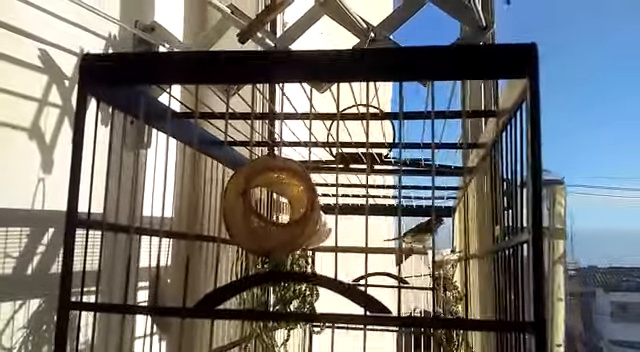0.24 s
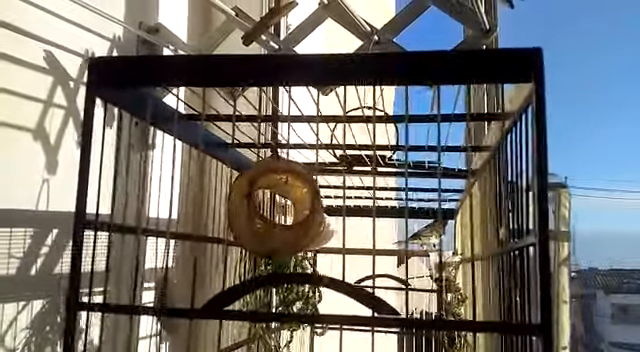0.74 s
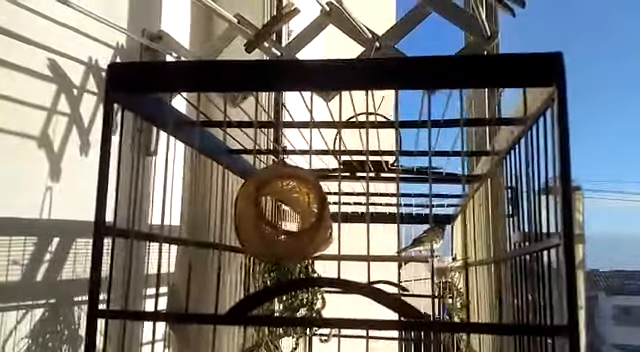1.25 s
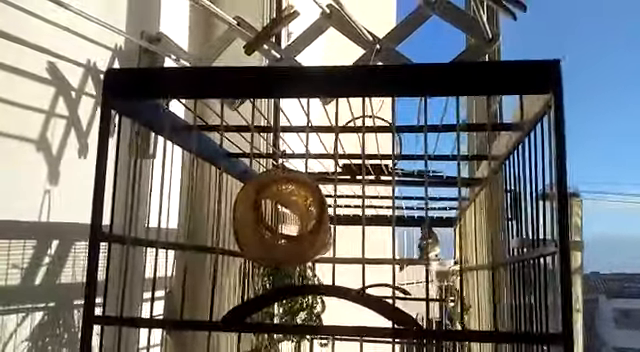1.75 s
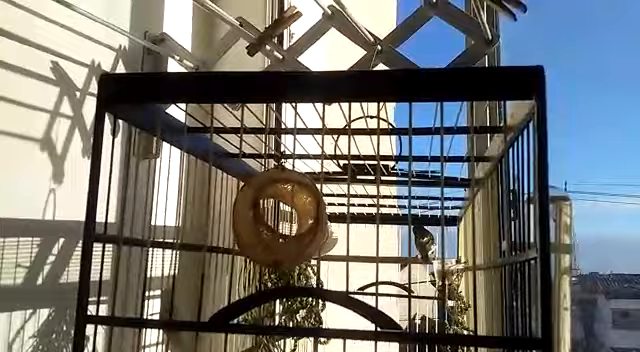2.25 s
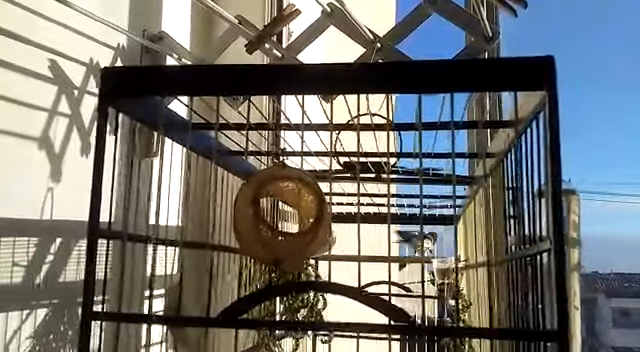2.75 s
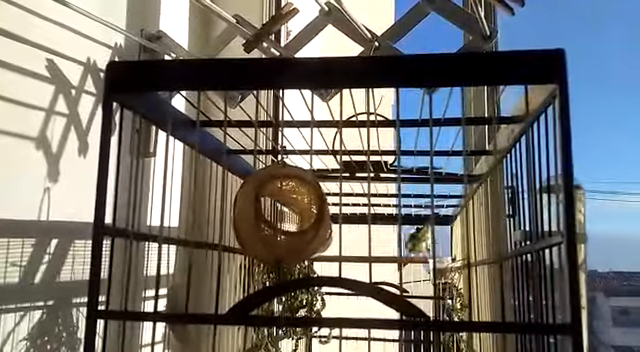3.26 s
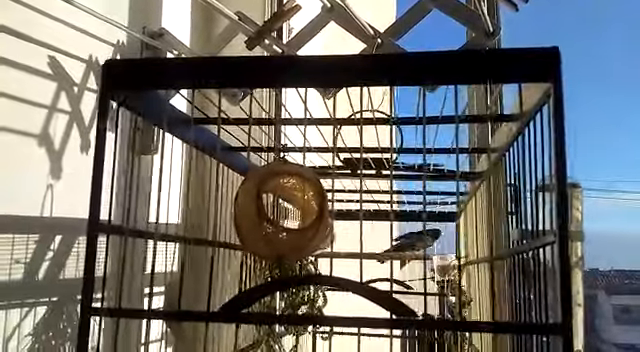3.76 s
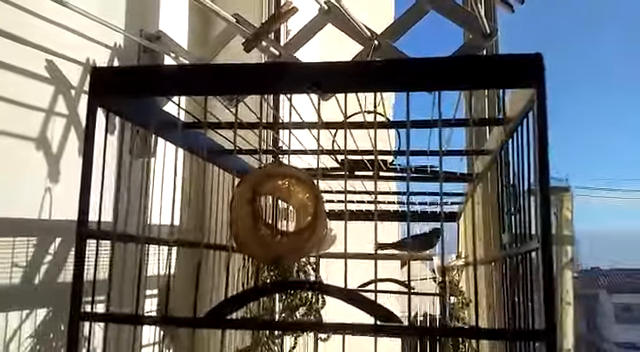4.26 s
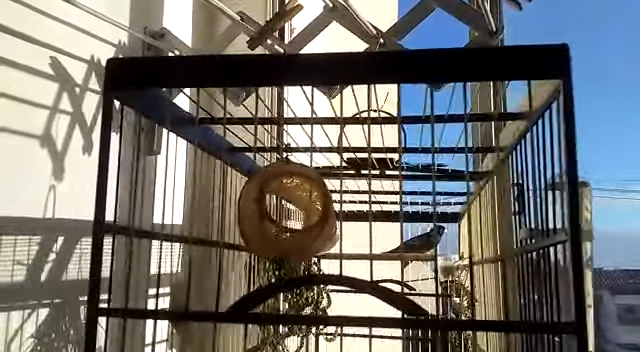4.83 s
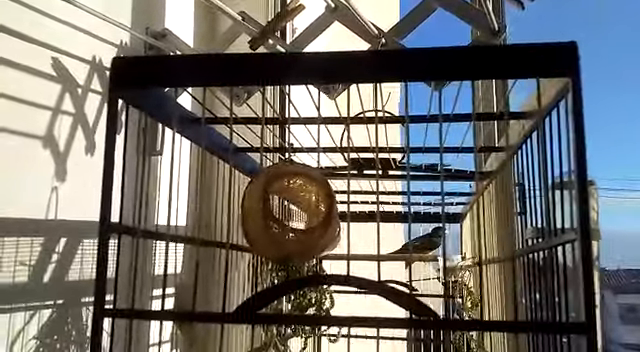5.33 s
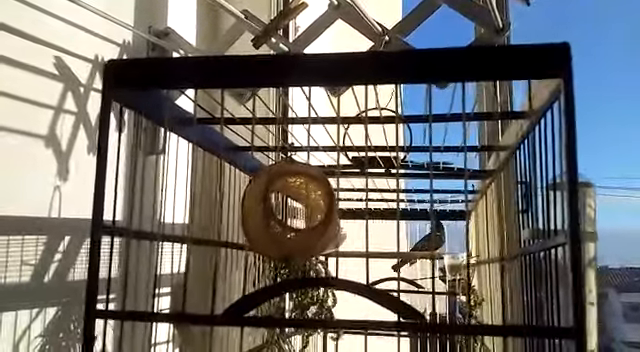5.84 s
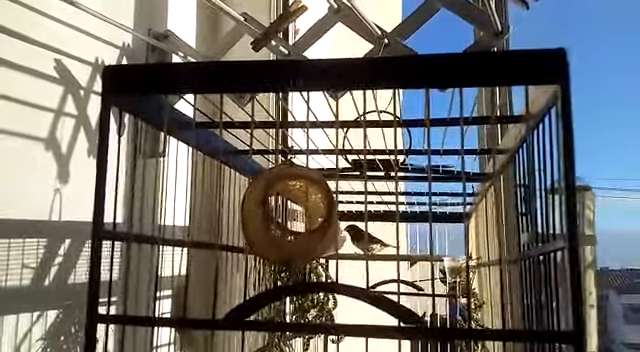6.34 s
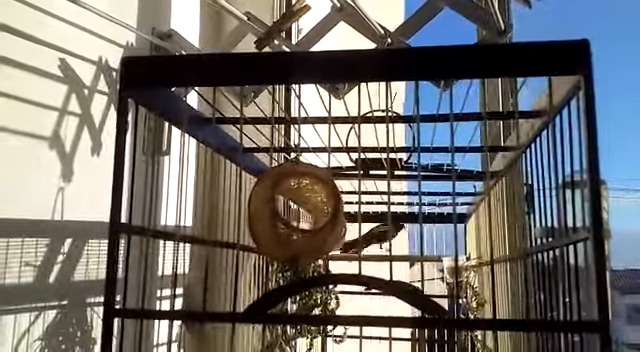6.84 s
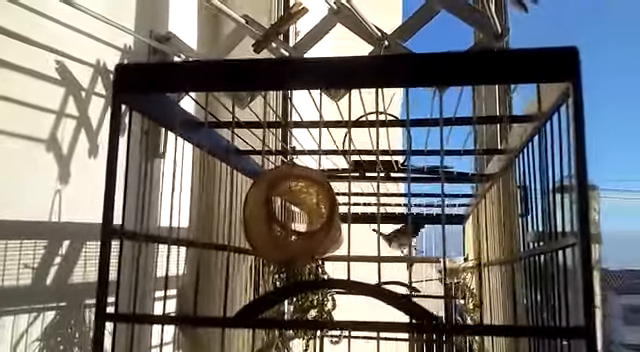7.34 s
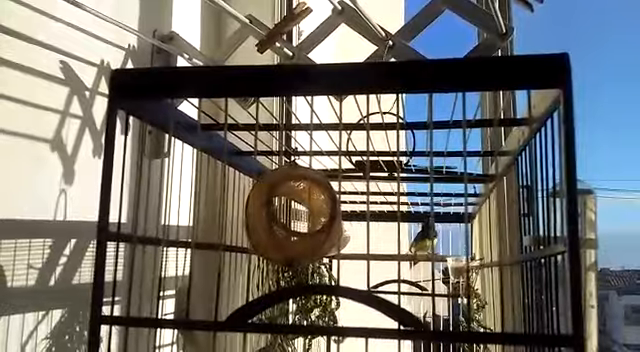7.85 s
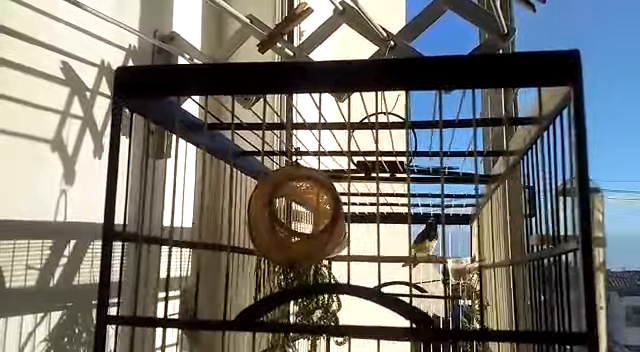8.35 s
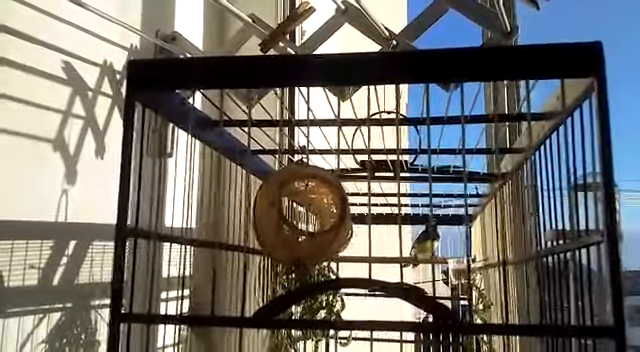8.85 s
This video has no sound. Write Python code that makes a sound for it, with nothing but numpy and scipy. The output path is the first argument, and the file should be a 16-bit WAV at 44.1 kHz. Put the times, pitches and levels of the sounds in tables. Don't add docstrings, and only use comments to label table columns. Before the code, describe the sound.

A close microphone catches a caged songbird's very loud, high phrases, each a short buzz sliding down into a clear whistle, with bright wall echoes. Between its two phrases come soft hollow thuds, a faraway bird's blurred reverberant song, and metallic claw ticks. Distant traffic, surging engine rumble, motor hum, faint insects and hiss continue underneath. The second phrase finishes with fast, piercing repeated notes.

```python
import sys
import numpy as np
from scipy import signal
from scipy.io import wavfile
from scipy.ndimage import uniform_filter1d

SR = 44100
rng = np.random.default_rng(int(sys.argv[2]) if len(sys.argv) > 2 else 0)


def materialize(psi):
    bounded = np.clip(np.atleast_2d(psi).T, -1, 1)
    quanta = np.round(bounded * 32767).astype(np.int16)
    wavfile.write(sys.argv[1], SR, quanta)


def field_ratio(decibels):
    return 10 ** (np.asarray(decibels, dtype=float) / 20)


N = 400869


def evened(x):
    return x / np.sqrt(np.mean(x ** 2) + 1e-20)


def add(mix, start_s, sound):
    part = mix[round(start_s * SR):][:len(sound)]
    part += sound[:len(part)]


def drift(size, rate_hz):
    knots = rng.standard_normal(max(int(size / SR * rate_hz * 4) + 8, 8192))
    smooth = uniform_filter1d(uniform_filter1d(knots, size=2), size=3)
    return np.interp(np.arange(size) / SR * rate_hz * 4, np.arange(len(knots)), evened(smooth))


def swells(rows, rest_db):
    t = np.arange(0, N + 64, 64) / SR
    power = field_ratio(rest_db) ** 2
    for peak_s, db, half_s in rows:
        power = power + field_ratio(db) ** 2 * np.exp(-2 * ((t - peak_s) / half_s) ** 2)
    return np.interp(np.arange(N) / SR, t, np.sqrt(power))


def resonate(x, hz, width_hz):
    turn = np.exp(2j * np.pi * np.cumsum(hz * np.ones(len(x))) / SR)
    r = np.exp(-np.pi * width_hz / SR)
    return 2 * (turn * signal.lfilter([1 - r], [1, -r], x / turn)).real


def noise(spectrum, patchy_db, size=2048):
    hz = np.fft.rfftfreq(size, 1 / SR)
    knot_hz, knot_db = np.transpose(spectrum)
    count = min(len(hz), size * len(spectrum) ** 2 // 390)
    z = np.zeros((len(hz), 4 * N // size + 5), complex)
    real, imag, patches = rng.standard_normal((3, count, z.shape[1]))
    patches = evened(uniform_filter1d(uniform_filter1d(patches, size=14, axis=0), size=8, axis=1))
    colour_db = np.interp(np.log(hz + 1), np.log(knot_hz + 1), knot_db, left=-90, right=-90)
    z[:count] = (real + 1j * imag) * field_ratio(colour_db[:count, None] + patchy_db * patches)
    return evened(signal.istft(z, nperseg=size, noverlap=3 * size // 4)[1][:N])


def echoes(x, start_s, rise_s, decays):
    t = np.arange(SR) / SR
    taps = np.zeros(SR)
    at = np.arange(0, SR - 12, 12)
    taps[at + rng.integers(0, 12, len(at))] = rng.choice([-1., 1.], len(at))
    taps *= np.clip((t - start_s) / rise_s, 0, 1) * sum(field_ratio(db - 60 * t / t60_s) for db, t60_s in decays)
    return signal.oaconvolve(x, taps / np.linalg.norm(taps))[:N]


def town():
    # hz, density_db
    rumble_spectrum = [(24, -39.5), (33, -20), (42, -5.5), (50, -13), (62, 3.8), (78, -8.5), (92, -20.5),
                       (102, -20), (135, -24)]
    drone_spectrum = [(76, -33), (130, 1), (199, -4.5), (242, -2), (322, -14.5), (330, -10), (430, -42),
                      (730, -120)]
    traffic_spectrum = [(260, -30.5), (450, -8.5), (556, -5), (811, -2), (1110, -8.5), (1210, -8.5),
                        (1500, -8.5), (1950, -33.5), (3300, -120)]
    hiss_spectrum = [(59, -26), (100, 1.5), (173, -18), (248, -18.5), (300, -18), (363, -15), (508, -20.5),
                     (809, -20), (1370, -28), (1800, -23.5), (2480, -29.5), (3860, -32.5), (5180, -30),
                     (7120, -35.5), (15500, -39.5)]
    # peak_s, peak_db, half_length_s
    surge_rows = [(.17, -44, 0.13), (.84, -40.5, 0.27), (1.4, -41.5, 0.37), (1.7, -34.5, .07),
                  (1.9, -42.5, 0.089), (3.04, -43.5, 0.11), (3.42, -44, .2), (3.97, -50, 0.084),
                  (4.4, -44.5, .1), (4.82, -31, 0.054), (5.3, -38.5, .06), (5.48, -41.5, 0.088),
                  (5.72, -44, .15), (6.16, -38.5, .08), (6.48, -41.5, 0.12), (6.76, -36, .06),
                  (7.12, -40, 0.16), (7.38, -34, .1), (7.72, -36.5, 0.07), (7.89, -35.5, 0.075),
                  (8.3, -43.5, 0.36), (8.78, -40, 0.039), (9.08, -41, 0.17)]
    # time_s, level_db
    passing_rows = [(0, -65), (.38, -58), (.8, -61.5), (1.6, -57), (2.4, -61.5), (2.76, -56), (3.2, -74.5),
                    (4.0, -53.5), (4.8, -57.5), (5.35, -64), (6.0, -59), (6.76, -55), (7.4, -55),
                    (7.87, -61), (8.15, -49.5), (9.09, -55.5)]

    rumble = swells(surge_rows, rest_db=-51.5) * noise(rumble_spectrum, patchy_db=-0.3, size=8192)
    drone_db = -56.5 - 3.5 + 1.5 * drift(N, 1.5)
    drone = field_ratio(drone_db) * noise(drone_spectrum, patchy_db=2.0, size=4096)
    traffic_db = np.interp(np.arange(N) / SR, *np.transpose(passing_rows)) - 2.5
    traffic = field_ratio(traffic_db) * noise(traffic_spectrum, patchy_db=3.5)
    hiss_to_top = [*hiss_spectrum, (17000, hiss_spectrum[-1][1])]
    hiss = field_ratio(-52 - 2.5) * noise(hiss_to_top, patchy_db=1.56)
    return rumble + drone + traffic + hiss


def insects():
    # centre_hz, width_hz, level_db
    chirr_bands = [(6500, 300, -78.5), (9246, 1100, -78)]
    out = np.zeros(N)
    for hz, width_hz, db in chirr_bands:
        band = resonate(resonate(rng.standard_normal(N), hz, width_hz), hz, width_hz)
        out += field_ratio(db + 2.5 * drift(N, 3.1)) * evened(band)
    return out


def machine():
    # hz, level_db
    hum_lines = [(177.6, -64.5), (242.2, -67), (355.3, -65.5), (414.5, -68), (807.5, -63), (947.5, -73.5),
                 (1351, -91), (1836, -74.5), (2008, -88)]
    # peak_s, peak_db, half_length_s
    whine_rows = [(.15, -55.5, 0.031), (.38, -53.5, 0.075), (.78, -62.5, 0.091), (1.2, -49.5, .15),
                  (1.82, -58, 0.085), (2.13, -57.5, .1), (2.88, -58.5, 0.32), (3.82, -53.5, 0.11),
                  (4.8, -58, 0.35), (5.11, -54, 0.033), (5.82, -52.5, 0.034), (6.08, -63, 0.1),
                  (6.68, -52.5, 0.093), (7.44, -52, 0.031), (7.72, -56.5, 0.21), (8.4, -55.5, .07),
                  (8.68, -52.5, .1)]
    whine_hz = 806

    t = np.arange(N // 8 + 1) * 8 / SR
    lines = np.zeros(len(t))
    for hz, db in hum_lines:
        if abs(hz - whine_hz) > 20:
            lines += field_ratio(db + 4.5 * drift(len(t), 60)) * np.sin(2 * np.pi * hz * t)
    thin_band = evened(resonate(rng.standard_normal(N), whine_hz, 2))
    whine = field_ratio(-3.0) * swells(whine_rows, rest_db=-72.5) * thin_band
    return np.sqrt(2) * signal.resample_poly(lines, 8, 1)[:N] + whine


def thuds():
    # start_s, peak_db, length_s
    thud_rows = [
        (3.151, -31, 0.082),
        (3.583, -33.5, 0.0687),
        (3.969, -38.5, 0.068),
    ]
    # hz, width_hz, level_db
    body_modes = [(225, 133, 1.5), (414, 31, -4), (674, 28, -25)]
    # start_s, length_s, pitch_hz, width_hz, level_db
    knock_rows = [
        (.32, 0.042, 1320, 252, -52),
        (1.164, 0.048, 1990, 60, -58.5),
        (3.948, 0.091, 1225, 40, -61),
        (4.122, 0.09, 1230, 60, -77),
    ]

    out = np.zeros(N)
    for start_s, db, length_s in thud_rows:
        push = rng.standard_normal(int(length_s * SR))
        body = np.zeros(len(push))
        for hz, width_hz, mode_db in body_modes:
            mode = resonate(resonate(push, hz, width_hz), hz, width_hz)
            body += field_ratio(mode_db) * mode / np.sqrt(width_hz)
        add(out, start_s, field_ratio(db - 4.5) * evened(body) * signal.windows.tukey(len(push), .5))
    for start_s, length_s, hz, width_hz, db in knock_rows:
        push = rng.standard_normal(int(length_s * SR))
        knock = evened(resonate(resonate(push, hz, width_hz), hz, width_hz))
        add(out, start_s, field_ratio(db) * knock * signal.windows.tukey(len(push), .3))
    return out + field_ratio(-8) * echoes(out, 0.016, 0.029, [(0.1, 0.5)])


def cage():
    # start_s, peak_db, low_ring_db and top_db (over the peak), t60_s
    tick_rows = [(0.3304, -48.5, -12, -19, 0.077), (3.469, -47, -8.5, -17.5, 0.067),
                 (6.0601, -32.5, -24, -15, 0.06), (6.3005, -46, -37, -12.5, 0.06),
                 (6.6194, -57, -14, -18, 0.06), (6.8833, -40, -3, -29, 0.072), (6.9363, -38, -1, -17, 0.06),
                 (7.001, -42, 0, -21, 0.068), (7.3603, -39, -2, -25.5, 0.078)]
    # hz, level_db, t60_s (the tick's own t60 rules)
    wire_modes = [(4150, -5, 0.11), (4720, 13, 0.068), (5900, 5, 0.028), (6170, -20, 0.41),
                  (8300, -13, 0.2), (11100, -20.5, 0.07), (12230, -19.5, 0.16), (12200, -25, 0.16),
                  (14300, -20, 0.26)]

    out = np.zeros(N)
    t = np.arange(SR // 5) / SR
    for start_s, db, low_db, top_db, t60_s in tick_rows:
        scratch = np.diff(rng.standard_normal(len(t) + 1))
        ring = np.zeros(len(t))
        for hz, wire_db, _ in wire_modes:
            mode_db = (low_db + 13.) * (hz < 6500) + (top_db + 10.) * (hz > 10000) + 0.51 * wire_db
            tuned_hz = hz * rng.uniform(1.0, 1.02)
            ring += field_ratio(mode_db) * resonate(scratch, tuned_hz, 280) * 5000 / hz
        dry_scratch = scratch * field_ratio(top_db + 6.0 - 60 * t / 0.044)
        add(out, start_s, field_ratio(db - 7.0 - 60 * t / t60_s) * (.7 * evened(ring) + dry_scratch))
    return out + field_ratio(-2.5) * echoes(out, 0.0024, 0.0036, [(0.1, 0.36)])


def syrinx(hz, db, edge_s, half_db, breath_db, bright_db=0., fuzz=.25):
    # multiple, level_db
    overtone_rows = [(2, -34.5), (3, -32.5), (4, -43.5)]
    turn = 2 * np.pi * np.cumsum(hz) / SR
    upper = field_ratio(half_db) * (np.sin(3 * turn / 2) + 0.12 * np.sin(5 * turn / 2))
    for k, overtone_db in overtone_rows:
        upper += field_ratio(overtone_db + bright_db) * np.sin(k * turn) * (k * hz < 19000)
    tone = np.sin(turn) * (1 + field_ratio(breath_db) * drift(len(hz), 1500))
    tone += upper * (1 + fuzz * drift(len(hz), 2500))
    t = np.arange(len(hz)) / SR
    fade = np.clip(np.minimum(t, t[-1] - t) / edge_s, 0, 1) ** 2
    return np.sqrt(2) * field_ratio(db) * tone * fade


def glide(start_s, length_s, first_hz, last_hz, db, swell_db, release_db=7, settle=1.9, linger=0.98,
          break_db=0.):
    peak_at = 0.69
    u = np.linspace(0, 1, num=40)
    hz = last_hz + (first_hz - last_hz) * (1 - u ** linger) ** settle
    level_db = db - swell_db * np.clip(1 - u / peak_at, 0, 1)
    level_db -= release_db * np.clip((u - peak_at) / (1 - peak_at), 0, 1) ** 2
    level_db -= break_db * np.exp(-((hz - 4190) / 70.) ** 2)
    return np.transpose([start_s + u * length_s, level_db, hz])


def whistle(rows, wobble, edge_s=0.0031, half_db=-50, breath_db=-36, bright_db=-5.0, fuzz=0.083):
    s, db, hz = np.transpose(rows)
    t = np.arange(s[0], s[-1], 1 / SR)
    pitch_hz = uniform_filter1d(np.interp(t, s, hz), size=200, mode="nearest")
    pitch_hz = pitch_hz * (1 + wobble * drift(len(t), 300))
    level_db = np.interp(t, s, db)
    return s[0], syrinx(pitch_hz, level_db, edge_s, half_db, breath_db, bright_db, fuzz)


def trill(start_s, length_s, hz, swing_hz, db, rise_share, dip_db, half_db, lead_s=0, focus_db=0.0,
          cycles_per_sweep=48, peak_at=0.87, buzz=0):
    t = np.arange(0, length_s, 1 / SR)
    u = t / length_s
    sweeps_per_s = hz / cycles_per_sweep
    cycle = (sweeps_per_s * np.maximum(t - lead_s, 0) + 0.088 * drift(len(t), 110) * u) % 1
    fall = np.clip(1 - rise_share, .05, .95)
    sweep = np.interp(cycle, [0, fall, 1], [1, -1, 1])
    sweep = uniform_filter1d(np.where(t < lead_s, .4, sweep), size=40, mode="nearest")
    pitch_hz = hz + swing_hz * (1 - 0.42 * u ** 3) * sweep

    dip = uniform_filter1d(1. * (cycle > fall), size=70)
    blip_db = -4 - 18 * (2 * t / (lead_s + 1e-9) - .9) ** 2
    blip_db = uniform_filter1d(np.where(t < lead_s, blip_db, 0), size=30)
    level_db = db - 11 * (1 - u / peak_at) ** 2 + blip_db - dip_db * dip
    level_db -= focus_db * sweep ** 2

    buzz_hz = 429.2 * (1 + .12 * drift(len(t), 200))
    split = buzz * (t > lead_s) * (1 - u ** 3)
    beat = 1 - split + split * np.sqrt(2) * np.cos(2 * np.pi * np.cumsum(buzz_hz) / SR)
    voice = syrinx(pitch_hz, level_db, .003, half_db, breath_db=-24, bright_db=1.5, fuzz=.4)
    return start_s, beat * voice


def far_bird():
    # start_s, length_s, first_hz, last_hz, peak_db
    far_whistles = [(1.523, .07, 3873, 3360, -60.5), (3.79, .16, 4205, 3655, -58),
                    (4.1, 0.11, 3390, 3280, -67.5), (4.135, .195, 4500, 3694, -49.5),
                    (4.328, 0.12, 5213, 4617, -42.5), (4.47, 0.117, 2905, 3070, -51.5),
                    (4.561, 0.18, 4000, 4000, -44.5), (4.9, .1, 5187, 4928, -42.5),
                    (5.079, .3, 3620, 3476, -55.5), (5.109, 0.044, 3250, 2945, -53),
                    (5.179, 0.25, 3300, 2916, -60)]
    # start_s, length_s, centre_hz, swing_hz, level_db
    far_trills = [(3.728, 0.061, 4206, 597, -55), (4.136, 0.073, 4150, 409, -70),
                  (4.318, 0.096, 5080, 350, -67), (4.575, .2, 3206, 412, -48.5),
                  (4.822, .075, 5430, 693, -39.5), (5.039, .12, 5120, 1306, -42.5),
                  (5.237, .14, 5080, 1542, -45.5), (5.118, 0.29, 3250, 380, -56)]
    # start_s, length_s, first_hz, last_hz, peak_db
    chirp_rows = [(0, 0.11, 5900, 5780, -66.5), (.325, 0.063, 5500, 5770, -65), (.53, .06, 5300, 5240, -70),
                  (.65, .06, 5250, 5270, -69), (.745, .63, 5264, 5120, -75.5),
                  (1.43, 0.18, 5180, 5000, -68.5)]
    # start_s, length_s, first_hz, last_hz, peak_db
    sweep_rows = [
        (4.984, .065, 8300, 5780, -41),
        (5.181, .085, 9330, 5750, -43),
    ]

    song, sweeps = np.zeros((2, N))
    for row in far_whistles:
        course = glide(*row, swell_db=3.023, release_db=3.5, settle=2.1)
        add(song, *whistle(course, wobble=.017, edge_s=0.007, breath_db=-20.0))
    for row in far_trills:
        add(song, *trill(*row, rise_share=.3, dip_db=4.0, half_db=-30))
    for row in chirp_rows:
        add(song, *whistle(glide(*row, swell_db=1.5, release_db=4.), wobble=.03, edge_s=.006))
    for row in sweep_rows:
        add(sweeps, *whistle(glide(*row, swell_db=13.0, settle=2.5), wobble=.01, edge_s=0.0055))
    facing = field_ratio(-3.5) * sweeps + field_ratio(5.5) * echoes(sweeps, 0.011, 0.024, [(-2.0, 0.8), (-13, 0.85)])
    return facing + field_ratio(4.0) * echoes(song, 0, .003, [(-6.5, .2), (3.9, .9), (-16, 1.4)])


def bird():
    # start_s, length_s, centre_hz, swing_hz, level_db
    trill_rows = [
        (1.697, 0.062, 4204, 385, -11),
        (2.1025, 0.069, 4290, 400, -6.5),
        (2.363, .075, 5363, 759, -4.5),
        (7.427, 0.07, 4001, 380, -14.5),
        (7.825, .068, 4240, 400, -5.5),
        (8.069, 0.067, 5428, 754, -2),
    ]
    # start_s, length_s, centre_hz, swing_hz, level_db
    rasp_row = (8.314, .058, 4650, 1750, -9)
    # length_s, first_hz, last_hz, peak_db, swell_db
    whistle_rows = [(.115, 4430, 3786, -9.5, 12.5), (.12, 4440, 3670, -8.5, 2),
                    (.105, 4962, 4290, -4.5, -1.3), (.1, 4272, 3700, -13, 10), (.116, 4660, 3630, -9, 1.5),
                    (.112, 4920, 4375, -1.5, 2), (.088, 4570, 4320, -2.5, -4)]
    # time_s, level_db, pitch_hz
    arch_tables = [
        [(0, -10, 6235), (.01, -21.5, 6820), (.022, -6, 7010)],
        [(.014, -34.5, 7800), (.03, -12, 6824), (.045, -1.5, 6107), (.06, -1.5, 5470), (.07, -11, 5464)],
        [(.068, -20, 4100), (.08, -6, 4565), (.087, -5, 4750), (.091, -8.5, 5205)],
        [(.002, -47, 9360), (.02, -39.5, 9200), (.042, -42.5, 9360)],
        [(.094, -16, 3518), (.108, -10, 4057), (.118, -12.5, 3964), (.14, -11, 3191), (.165, -19.5, 2846)],
    ]
    # half_way_lines_db, overtone_lift_db, overtone_fuzz
    arch_voices = [(-50.5, 8.5, .3), (-42, 8, 0.3), (-32.5, -1.5, 1.6), (-47, -19.5, 0.28),
                   (-38.5, -8.5, 1.4)]
    # start_s, level_db
    figure_rows = [
        (8.492, 1),
        (8.696, 0.6),
        (8.904, -0.8),
    ]
    # delay_s, level_db
    wall_echoes = [(.0021, -15), (.0037, -6.5), (.0058, -14), (.0083, -11.5), (0.0125, -7), (.017, -11)]

    song = np.zeros(N)
    for row in trill_rows:
        low = row[2] < 5000
        add(song, *trill(*row, rise_share=0.45, dip_db=3.0 + 7.8 * low, half_db=-42.5 + 11.0 * low,
                         lead_s=.0105 * low, peak_at=.95 - .35 * low, buzz=0.6 * low))
    add(song, *trill(*rasp_row, rise_share=0.28, dip_db=10.5, half_db=-24.5, focus_db=6.5,
                     cycles_per_sweep=50.))
    for (start_s, length_s, *_), row in zip([*trill_rows, rasp_row], whistle_rows):
        course = glide(start_s + length_s - .001, *row, linger=1.35, break_db=8.)
        add(song, *whistle(course, wobble=.003))
    for figure_s, db in figure_rows:
        for rows, (half_db, bright_db, fuzz) in zip(arch_tables, arch_voices):
            start_s, arch = whistle(rows, 0.0036, 0.0023, half_db, -22.0, bright_db, fuzz)
            add(song, figure_s + start_s, field_ratio(db) * arch)

    windpipe = signal.butter(8, 2900, "high", fs=SR, output="sos")
    song = signal.sosfilt(windpipe, song)
    soaked = signal.butter(1, 8000, fs=SR, output="sos")
    dull = signal.sosfilt(soaked, song)
    close = song.copy()
    for delay_s, db in wall_echoes:
        add(close, delay_s, field_ratio(db) * song)
    return field_ratio(-0.45) * close + field_ratio(-4.5) * echoes(dull, 0.0041, 0.01, [(0.5, .3), (-21, .9)])


def scene():
    return (town() + insects() + machine() + thuds() + cage() + far_bird() + bird())[None]


def top_cut(x):
    return signal.sosfilt(signal.butter(12, 15690, fs=SR, output="sos"), x)


def record(dry):
    ceiling, let_go_db_per_s = .965, 500.
    fall_db = np.arange(N) * let_go_db_per_s / SR
    over_db = np.maximum(20 * np.log10(abs(dry) / ceiling + 1e-9), 0)
    held_db = np.maximum.accumulate(over_db + fall_db, axis=1) - fall_db
    return top_cut(dry * field_ratio(-held_db))


dry = scene()
out = record(dry)
materialize(out)
```